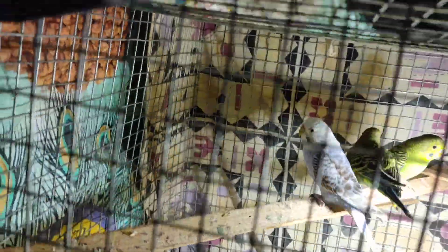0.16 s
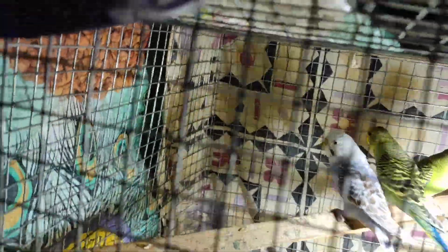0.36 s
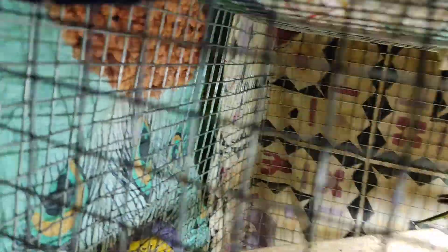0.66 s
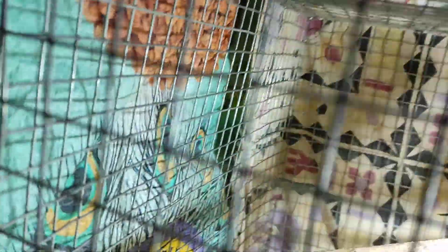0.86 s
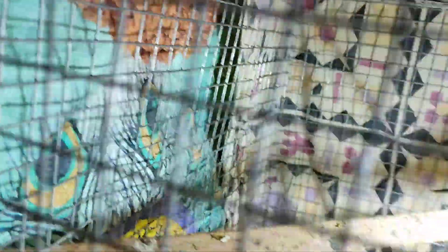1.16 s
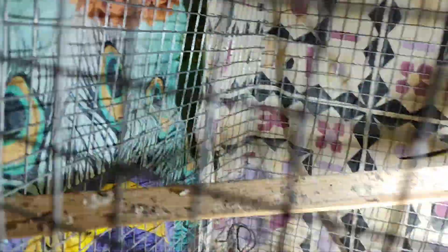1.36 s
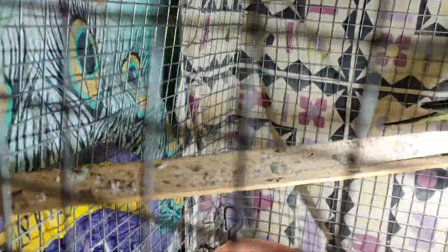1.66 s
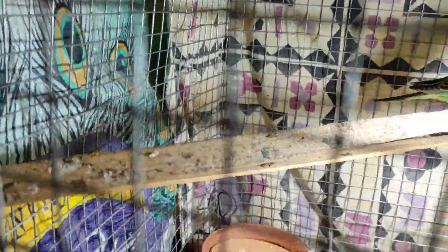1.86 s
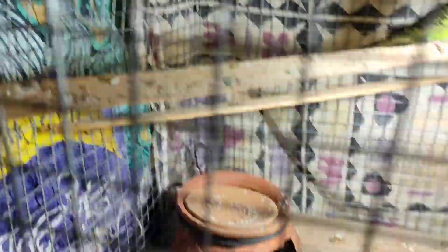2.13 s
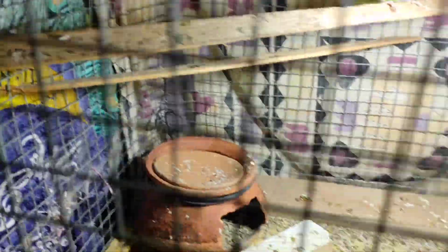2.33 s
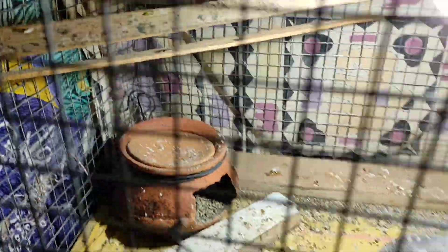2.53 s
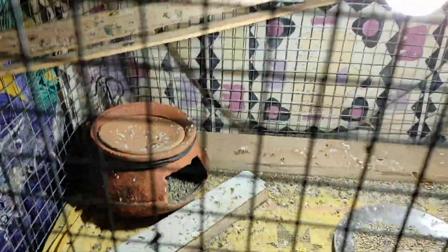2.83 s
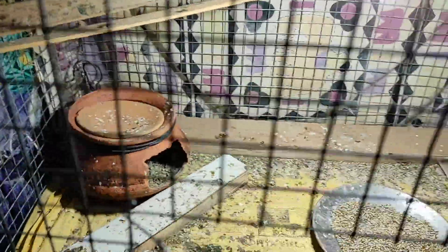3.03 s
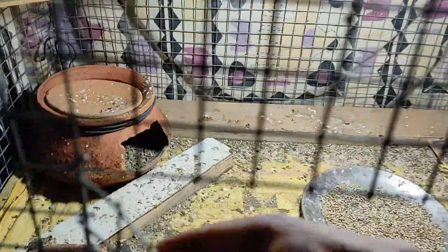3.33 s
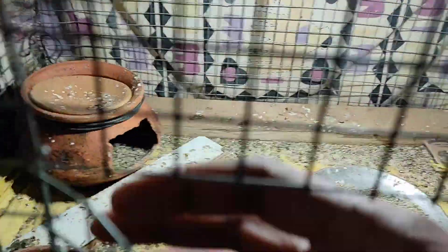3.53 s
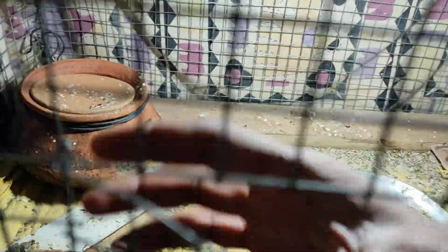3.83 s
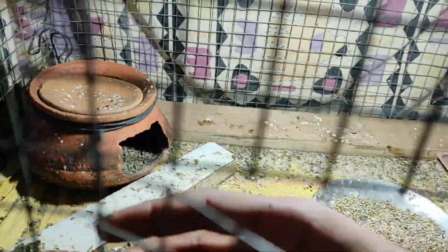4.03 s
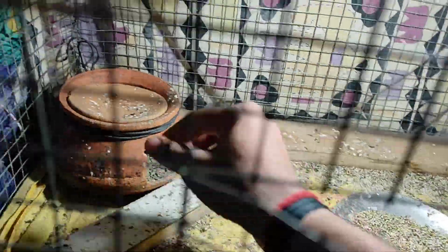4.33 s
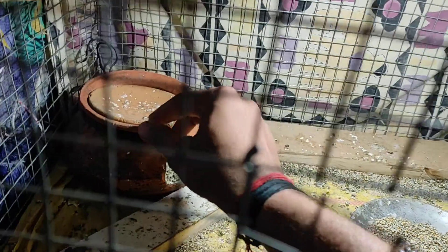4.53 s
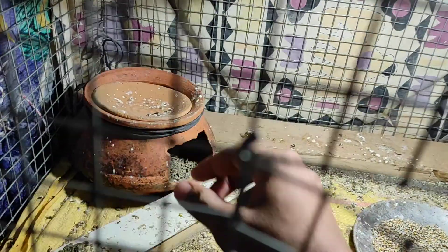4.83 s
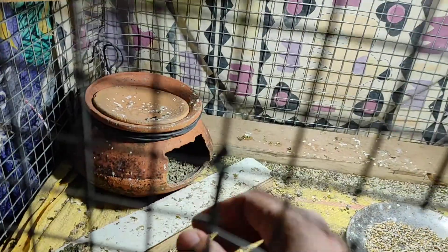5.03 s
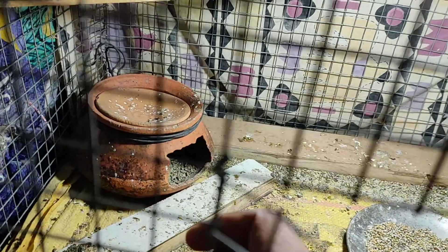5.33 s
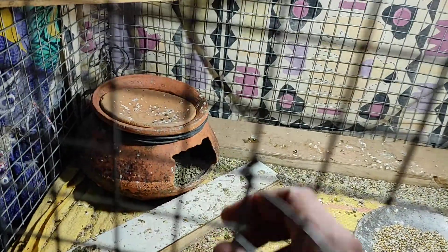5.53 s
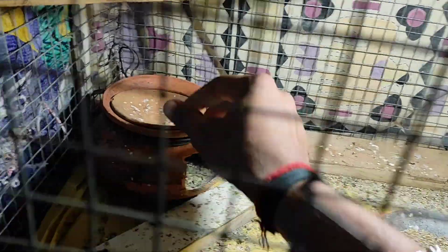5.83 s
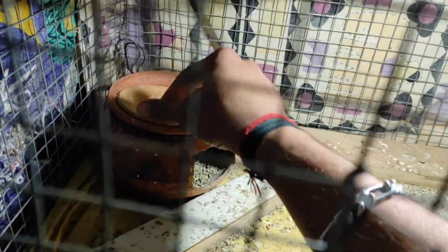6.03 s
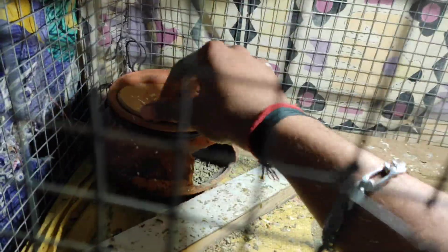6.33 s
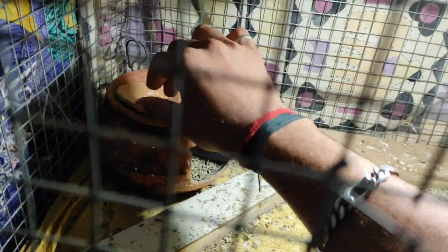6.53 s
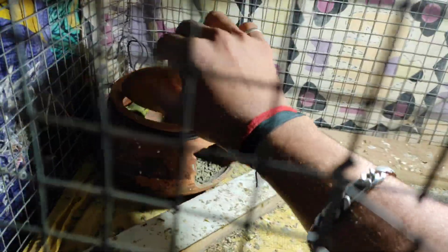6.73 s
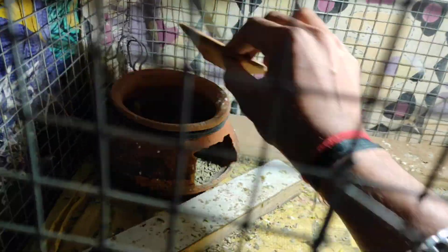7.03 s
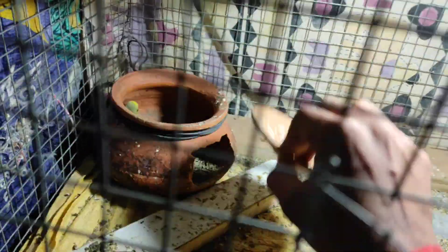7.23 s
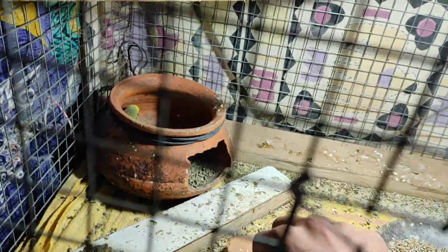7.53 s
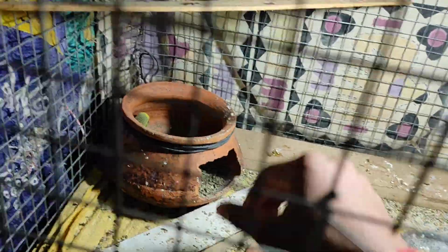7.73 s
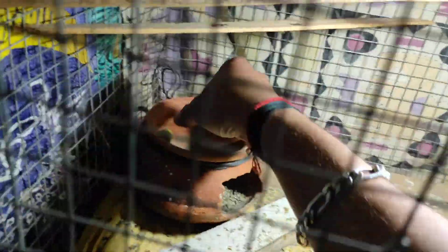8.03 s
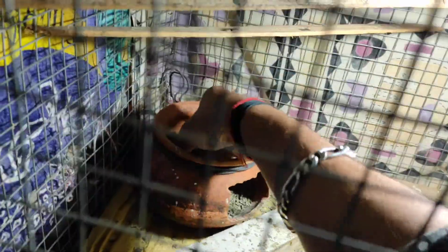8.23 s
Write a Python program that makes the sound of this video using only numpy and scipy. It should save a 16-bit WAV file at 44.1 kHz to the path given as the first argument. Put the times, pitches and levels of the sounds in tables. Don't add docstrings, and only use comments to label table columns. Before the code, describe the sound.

Wings flutter and claws clatter on cage wire, then a young bird begs in rapid, even, raspy high chirps while clay is tapped.

```python
import sys
import numpy as np
from scipy import signal
from scipy.fft import rfft, irfft, next_fast_len
from scipy.io import wavfile
from scipy.ndimage import uniform_filter1d, minimum_filter1d

SR = 44100
rng = np.random.default_rng(int(sys.argv[2]) if len(sys.argv) > 2 else 0)


def invert_db(x):
    u = np.asarray(x, float) / 20
    return 10 ** u


def persist_wave(psi):
    counts = np.round(np.clip(psi, -1, 1) * 32767).astype(np.int16)
    wavfile.write(sys.argv[1], SR, np.atleast_2d(counts).T)


N = 369999

# (frequency [Hz], density [dB])
ROOM_SPECTRUM = [(150, -34), (250, 10), (312, -46.5), (340, -14.5), (531, 1.5), (736, -33), (873, -57.5),
                 (951, -10), (3000, -15), (5010, -25.5), (7430, -18.5), (15000, -65)]
# (time [s], length [s], pitch [Hz], glide [ratio], level [dB])
FAR_NOTES = [
    (5.27, .08, 540, 1, -58),
    (6.11, .12, 545, 1, -54),
    (.89, .055, 4400, .75, -37),
    (1.09, .045, 5800, .9, -36),
    (5.595, .075, 1900, 1.05, -43),
    (5.6, .07, 3500, 1.08, -42),
    (5.61, .06, 3900, .95, -47),
    (5.755, .06, 2900, .75, -44),
    (5.86, .095, 2850, .92, -45),
]
# (time [s], level [dB])
SHAKE = [(0, -53), (.21, -62.5), (.61, -54.5), (.72, -34), (1.0, -52), (1.05, -39), (1.8, -40), (1.85, -66),
         (1.94, -40), (2.34, -60), (3.55, -58.5), (3.9, -50), (4.11, -62), (6.6, -55.5), (7.43, -64),
         (7.52, -48), (7.97, -47), (8.01, -59)]
# (time [s], half length [s], thud level [dB], creak level [dB])
FINGER_SHIFTS = [
    (0.224, 0.74, -79, -60),
    (1.397, 0.2, -59, -42.5),
    (1.89, 0.14, -48, -42.5),
    (2.47, 0.086, -69, -36.5),
    (2.69, 0.27, -55, -51.5),
    (3.438, 0.031, -41, -65),
    (6.79, 0.18, -68, -51.5),
    (7.392, 0.29, -73.5, -48),
    (8.39, 0.11, -58, -47),
]
# (time [s], level [dB])
RUSTLE = [(0, -56), (.45, -68), (.5, -56), (.6, -39), (.8, -32.5), (1.0, -35), (1.12, -36), (1.18, -35),
          (1.24, -37), (1.32, -40.5), (1.4, -39), (2.05, -40), (2.85, -44.5), (3.5, -51), (6.55, -57),
          (7.0, -63.5), (7.35, -53), (7.84, -40.5), (8.05, -57), (8.13, -58), (8.39, -52)]
# (time [s], treble level [dB], 1-4.5 kHz level [dB])
SCUFFS = [(1.56, -44, -51), (1.93, -43, -43.5), (2.19, -37, -55), (2.45, -33, -37), (2.71, -38, -42.5),
          (2.97, -71, -55), (3.1, -50, -44.5), (3.23, -51, -86), (3.5, -72, -47), (3.8, -50, -65),
          (4.511, -55, -56), (4.641, -61, -60), (4.781, -75, -75), (4.91, -39.5, -47.5), (5.501, -66, -47),
          (5.65, -53, -46.5), (5.791, -36, -41.5), (6.75, -51, -59), (6.92, -63, -91), (7.49, -50, -44),
          (7.36, -55, -48)]
# (time [s], length [s], treble level [dB], relative 1-4.5 kHz level [dB], brightest [Hz])
WING_BEATS = [(0.523, 0.035, -27.5, -11.5, 7500), (0.554, 0.033, -36.5, -2.5, 8000),
              (0.611, 0.041, -36, -28, 7800), (0.686, 0.075, -37, -2, 7640), (0.831, 0.032, -39, 2, 7600),
              (0.886, 0.069, -31.5, -19, 8850), (0.957, 0.035, -24.5, -27, 7400),
              (0.993, .03, -47, -16, 7800), (1.052, 0.037, -34.5, -10, 8160),
              (1.076, 0.059, -23, -18.5, 7400), (1.124, 0.021, -31, -7, 8300),
              (1.194, 0.028, -37, -19, 8000), (1.259, 0.047, -35.5, -9, 8360),
              (1.325, 0.029, -41, 2.5, 7500)]
# (time [s], peak level [dB], relative 1-4 kHz level [dB], t60 [s])
WIRE_TICKS = [(0.3461, -49.5, -6, 0.026), (0.399, -42.5, -23, 0.071), (0.4604, -40, -25, 0.022),
              (0.482, -37, -19, 0.06), (0.494, -27, -15, 0.031), (0.518, -8.5, -28, 0.078),
              (0.543, -18, -20, 0.03), (0.602, -23.5, -19, 0.037), (0.636, -14.5, -10, 0.031),
              (0.692, -23, -9, 0.052), (0.7577, -1.5, -9.5, 0.018), (0.7987, -10, -8.5, 0.016),
              (0.8225, -12, -7.5, 0.018), (0.886, -22, -17, 0.063), (0.952, -18, -39, 0.03),
              (1, -18, -30, 0.013), (1.031, -19, -18, 0.033), (1.042, -12, -9, 0.03),
              (1.156, -21.5, -3, 0.029), (1.166, -25.5, 0, 0.035), (1.1922, -18, -15, 0.034),
              (1.2236, -20, -7.5, 0.026), (1.273, -27, -2.5, 0.034), (1.309, -27, -10, 0.048),
              (1.557, -23, -18, 0.023), (6.671, -41, -2, 0.069), (6.70, -40, -5, 0.045),
              (6.739, -32, -10, 0.038), (6.757, -22, 0.5, 0.033), (6.798, -40, -5, 0.081),
              (6.84, -39, -18, .025), (6.857, -34.5, -8, 0.026), (6.881, -37, -25, 0.028),
              (6.893, -36, -17, 0.033), (6.902, -42, -18, .025), (6.914, -36, -18, 0.027),
              (1.929, -25, -9, 0.049), (2.074, -25, -13, 0.039), (2.168, -41, -15, .04),
              (2.4415, -35, -10, .04), (7.296, -57, 2, 0.048), (7.322, -59, 0, .06), (7.492, -36, -7, 0.11),
              (8.0214, -37, -24, 0.072), (8.1395, -43.5, -12, 0.065), (8.1714, -42, -22, 0.058),
              (8.18, -37, -20, .04), (8.1958, -39, -24, 0.062), (8.2153, -42, -25, 0.077),
              (8.2682, -41, -18, .06), (8.281, -40, -14, 0.055), (8.3041, -40, -13, 0.079)]
# (time [s], peak level [dB], lowest mode [Hz], t60 [s], hardness [dB per octave])
BLOWS = [(0.24, -41, 464, 0.08, -4), (0.638, -22, 275, 0.043, -5), (0.709, -24, 214, 0.06, -27.5),
         (1.051, -18.5, 226, 0.11, -11), (1.111, -31, 200, 0.08, -16), (1.264, -34, 229, 0.13, -6),
         (2.432, -28, 413, 0.067, -16), (2.981, -35, 512, 0.054, -6), (3.078, -42, 584, 0.04, -2),
         (4.815, -39, 594, 0.14, 0), (4.916, -40, 350, 0.42, -4.5), (5.76, -42, 361, 0.18, -10),
         (6.692, -29, 242, 0.083, -5), (6.748, -28, 500, 0.046, -8), (7.071, -37.5, 318, 0.091, 0),
         (7.294, -28, 332, 0.045, -2)]
KNOCK_RATIOS = [1, 2.1, 3.1, 4.198, 5.1, 7.4]
# (frequency [Hz], level [dB], t60 [s])
WIRE_MODES = [(350, -4, 0.015), (1120, 0, 0.016), (1630, -9, 0.014), (2310, -4, 0.021), (3500, -16, .015)]
PERCH_MODES = [(376, -7, 0.074), (476, 1, 0.088), (1120, -9, 5.0), (1857, -25, 5.0), (2638, -28, 0.37),
               (2923, -58, 5.0)]
DOOR_MODES = [(191, -4, 0.11), (420, -3, 0.044), (650, -1, 0.07), (1110, -0.5, 0.068), (1448, -4, 0.045)]
LID_MODES = [(218, -3, 0.077), (574, 2, 0.043), (1140, -5, 0.053), (1615, -6, 0.058), (2520, -11, 0.037),
             (2950, -23, 0.033), (3400, -7, 0.018), (3830, -21, 0.055)]
CLUNK_TIMES = [
    0.757,
    2.443,
    3.416,
    6.755,
]
CLUNK_LEVELS = [
    -12,
    -25,
    -35.5,
    -23.5,
]
# (time [s], length [s], level [dB], third partial [dB])
CHIRPS_ALONE = [(1.344, 0.052, -17, 4), (1.463, 0.054, -14, -6.5), (1.582, 0.059, -17, 2),
                (1.706, 0.058, -19.5, 1.5), (1.831, 0.055, -17, 6), (1.956, 0.058, -16, 4),
                (2.087, 0.058, -14.5, -0.5), (2.207, 0.072, -15, 1.5), (2.344, 0.063, -11, -9),
                (2.475, 0.061, -14, -5), (2.607, 0.064, -17, -11.5), (2.736, 0.059, -17, -9),
                (2.863, 0.06, -16, -6.5), (2.994, 0.062, -16, 1), (3.122, 0.062, -10.5, -1),
                (3.254, 0.063, -15.5, 0.5), (3.389, 0.066, -18, -5.5), (3.531, 0.066, -16, 0.5),
                (3.676, 0.069, -18.5, 5.5), (3.824, 0.08, -18.5, -1.5), (3.979, 0.073, -19, -10),
                (4.121, 0.067, -16.5, -8.5), (4.255, 0.066, -16.5, -1.5)]
# (time [s], length [s], level [dB], third partial [dB])
CHIRPS_HAND = [(4.393, 0.066, -17.5, 6), (4.533, 0.064, -17, 2), (4.67, 0.059, -12.5, 3),
               (4.799, 0.063, -15.5, 0.5), (4.935, 0.078, -13, -4.5), (5.089, 0.066, -14, -5.5),
               (5.228, 0.066, -15, -1.5), (5.375, 0.07, -13.5, -4), (5.53, 0.071, -18, -1),
               (5.668, 0.074, -15.5, 1), (5.814, 0.067, -14.5, 2.5), (5.954, 0.069, -11, -8),
               (6.099, 0.069, -15.5, -4), (6.239, 0.066, -17.5, 0), (6.382, 0.083, -14.5, -7),
               (6.546, 0.069, -14.5, 1), (7.038, 0.072, -15.5, -12), (7.184, 0.076, -12, -8.5),
               (7.364, 0.076, -11, -17), (7.522, 0.074, -15, -5.5), (7.678, 0.082, -14.5, -6.5),
               (7.898, 0.079, -14.5, -3), (8.334, 0.21, -10.5, -9)]
FIRST_PARTIAL = [2, -5, 4, -10, -7.5, 0, 5, 1.5, 1.5, 0.5, -3.5, 3, 0, 0, -3.5, -6.5, 2, 0.5, 5, 1, -2.5,
                 -3.5, -7.5, -4, 1.5, 1.5, 4, 3, 6.5, 3, 2.5, 5, 1.5, -4, 0, 2, 1.5, 3, 1.5, -1.5, 0, -6,
                 1.5, 7, -0.5, -0.5]
SHYNESS = [-14, -4, -1, -7, -6, -21, -14, -23.5, -11.5, -14, -18, -6, -14, -6, -11.5, -11.5, -1, -7, -5.5,
           1, -8.5, -11.5, -6.5, 0.5, 0, -12.5, -20, -14, -7, -4, -7.5, 0.5, -9, -7, -15.5, -5, -9, -12, -6,
           0, -7, -4.5, 1, -6, -12, -14]
# (time [s], throb rate [Hz], top pitch [Hz])
SYRINX = [(1.342, 140.9, 2858), (2.089, 136.2, 2920), (2.211, 127.3, 2987), (4.1, 120.9, 3062),
          (4.453, 127.5, 2913), (5.103, 123.1, 2968), (5.8, 120.1, 2931), (6.553, 106.5, 2837),
          (7.04, 133.2, 3065), (7.179, 111, 2950), (8.341, 122.8, 2877)]
# (time [s], rasp against tone [dB])
HOARSENESS = [(1.3, -1), (1.6, -4), (2.3, -7), (3.3, -8), (4.4, -9), (5.7, -9), (6.4, -7), (7.0, -4),
              (8.4, -4)]
PARTIALS = [-11.5, -4.5, -10, -12.5, -6.5]
# (frequency [Hz], then left and right density [dB] for each of the five stages)
POT_COLOUR = [(1423, -21, -25.5, -30, -30.5, -30, -32.5, -31, -34.5, -29, -28),
              (1980, -17, -17.5, -25, -24, -25.5, -21, -15.5, -20.5, -16.0, -21),
              (2400.0, -10.5, -14, -20.5, -21.5, -19, -10.5, -21, -19, -20.5, -14),
              (2950.0, -17.5, -8.0, -16, -5.5, -10, -0.5, -15.5, -7.5, -15.5, -7.5),
              (3493, -23.5, -17, -25.5, -21.5, -29, -20, -26, -19.5, -21.5, -16.5),
              (3980, -10.5, -14, -19, -17, -18, -14, -15.5, -12, -11, -11.5),
              (4630, -13.5, -11, -15, -26, -14, -16, -7.5, -14, -7.0, -6.5),
              (5530, -0.5, -5.0, -4, -3.5, 2, -6, 1, -3.5, -2, -7.0),
              (6080, -3, 2.5, 1.5, -7.5, 1, -1, -0.5, 1.5, -8, -1),
              (6680, -4.5, -3, -13.5, -3, -6, 0.5, -13.5, 0, -3.5, 0.5),
              (7400.0, -4.5, -3, -17.5, -2, -8, 1.5, -16, -2.0, -1.5, 2.5),
              (8000.0, -9.5, -14.5, -12.5, -8, -9, -13.5, -9, -13, 2.5, 1),
              (8575, -1.0, -9, -4, -15, 1.5, -5, -0.0, -15.5, 2, -8.5),
              (9160, -5, -23, -12.5, -15, -15, -16, -14.5, -21.5, -7.5, -19),
              (9780, -26.5, -18.5, -34, -35.5, -30, -42, -29.5, -32, -25, -40),
              (11040, -13.5, -21, -21.5, -20, -16, -18, -19, -18.5, -20, -16),
              (12600, -39, -27, -40, -50, -34.5, -37, -42, -38, -22, -29),
              (14200.0, -35, -31.5, -39, -36, -37.0, -33.5, -37.5, -36.5, -39, -31)]
STAGE_ENDS = [
    2.15,
    3.2,
    4.35,
    6.9,
]


def band(x, lo_hz, hi_hz, order=2):
    return signal.sosfilt(signal.butter(order, [lo_hz, hi_hz], "band", fs=SR, output="sos"), x)


def unit(x):
    return x / np.sqrt(np.mean(x ** 2) + 1e-20)


def walk(rate, size=N):
    k = int(SR / rate)
    held = np.repeat(rng.standard_normal(size // k + 1), k)
    return 1.2 * uniform_filter1d(held, k)[:size]


def columns(table):
    s, *rest = np.transpose(table)
    return [np.interp(np.arange(N) / SR, s, c) for c in rest]


def bumps(times, half_s, db):
    t = np.arange(N) / SR
    return sum(invert_db(d) * np.clip(1 - abs(t - s) / h, 0, 1) ** 2 for s, h, d in np.broadcast(times, half_s, db))


def colour(x, hz, db, flatten_hz=0):
    size = next_fast_len(x.shape[-1])
    f, spec = np.fft.rfftfreq(size, 1 / SR), rfft(x, size)
    if flatten_hz:
        k = int(flatten_hz / f[1])
        own = uniform_filter1d(uniform_filter1d(abs(spec) ** 2, k), k)
        spec = spec / np.sqrt(abs(own) + 1e-4 * own.max())
    curve_hz = np.r_[.6 * hz[0], hz, 1.12 * hz[-1]]
    curve_db = np.r_[db[0] - 15, db, db[-1] - 9]
    gain_db = np.interp(np.log(f + 1), np.log(curve_hz), curve_db)
    return irfft(spec * invert_db(gain_db), size)[..., :x.shape[-1]]


def pair(like):
    mid, side = rng.standard_normal((2, N))
    like = np.clip(like, 0, 1)
    return np.sqrt(1 + like) * mid + np.sqrt(1 - like) * side * np.array([[1], [-1]])


def add(out, s, x):
    i = int(s * SR)
    n = min(x.shape[-1], out.shape[-1] - i)
    out[..., i:i + n] += x[..., :n]


def feathery(noise, mid_db, top_db, hz=7800):
    peak = unit(band(noise, .9 * hz, min(1.1 * hz, 9300)))
    high = peak + invert_db(-4) * unit(band(noise, 5900, 9200, order=4))
    top = invert_db(top_db) * unit(band(noise, 10000, 15500, order=3))
    mid = unit(band(noise, 900, 4000)) * invert_db(mid_db + np.array([[-1.5], [1.5]]))
    return unit(high) + top + mid


def room():
    hiss = band(colour(pair(.1), *np.transpose(ROOM_SPECTRUM)), 150, 9300, order=4)
    return unit(hiss) * invert_db(-62.5 + 3.0 * walk(0.98))


def far_tones():
    out = np.zeros((2, N))
    for s, length, hz, glide, db in FAR_NOTES:
        wobble = .005 if hz < 1000 else .05
        n = int(length * SR)
        pitch = [hz * np.linspace(1, glide, n) * (1 + wobble * walk(480, size=6000)[:n]) for _ in range(2)]
        phase = 2 * np.pi * np.cumsum(pitch, axis=1) / SR
        note = np.sin(phase) + invert_db(-4) * np.sin(2 * phase)
        add(out, s, invert_db(db) * signal.windows.tukey(n, .5) * note)
    return out


def handling():
    shake = invert_db(columns(SHAKE)[0])
    s, half_s, thud_db, creak_db = np.transpose(FINGER_SHIFTS)
    sway = invert_db(-56.5) + invert_db(-1.5) * uniform_filter1d(shake, int(0.24 * SR))
    thud = shake + bumps(s, half_s, thud_db)
    creak = invert_db(-69.5) + invert_db(-9.5) * shake + bumps(s, half_s, creak_db)
    deep = unit(band(pair(0.93), 19.2, 52.3)) * sway * invert_db(np.array([[3.0], [-5]]))
    low = unit(band(pair(0.85), 77.5, 224)) * thud
    low = low * invert_db(1.52 * walk(19) + np.array([[2.6], [-3.5]]))
    mid = unit(band(pair(0.1), 165, 810, order=3)) * creak
    mid = mid * invert_db(4.64 * walk(40) + np.array([[2.1], [-2.1]]))
    return deep + low + mid


def rustle():
    stir = invert_db(columns(RUSTLE)[0])
    s, treble_db, mid_db = np.transpose(SCUFFS)
    scuff_s = 0.2
    treble = stir + bumps(s, scuff_s, treble_db)
    mid = stir * invert_db(-7.5) + bumps(s, scuff_s, mid_db)
    grains = pair(0) * invert_db(3.04 * walk(130) + 1.4 * walk(780) + 5.3 * walk(25))
    return treble * invert_db(-3.5) * feathery(grains, 20 * np.log10(mid / treble), -19.5, 7670)


def flaps(size=4000):
    out = np.zeros((2, N))
    for s, length, db, mid_db, hz in WING_BEATS:
        grains = rng.standard_normal((2, size))
        grains = grains * invert_db(3.0 * walk(300, size=size) + 2.5 * walk(90, size=size))
        n = int(length * SR)
        swish = feathery(grains, mid_db, -24.5, hz)[:, :n]
        add(out, s, invert_db(db) * swish * signal.windows.tukey(n, .4))
    return out


def ticks(size=3000):
    out, t = np.zeros((2, N)), np.arange(size) / SR
    for s, db, mid_db, t60 in WIRE_TICKS:
        crack = feathery(rng.standard_normal((2, size)), mid_db, -17.5, rng.uniform(7440, 8270))
        decay = invert_db(db - 1.5 - 60 * t / max(t60, .004))
        add(out, s, crack * decay * np.clip(t / 0.0017, 0, 1))
    return out


def knocks(size=5000):
    out, t = np.zeros((2, N)), np.arange(size) / SR
    for s, db, hz, t60, hard_db in BLOWS:
        ring = np.zeros(size)
        for r in np.array(KNOCK_RATIOS) * (1 + 0.066 * rng.standard_normal(len(KNOCK_RATIOS))):
            strike_db = min(hard_db, 0) * np.log2(r)
            decay_db = -60 * t * r ** 0.57 / max(t60, .01)
            shudder_db = 6.4 * walk(243, size=size)
            ring += invert_db(strike_db + decay_db + shudder_db) * np.sin(2 * np.pi * hz * r * t)
        add(out, s, invert_db(db - 7.5 + np.array([[1.5], [-2.5]])) * ring * np.clip(t / 0.0016, 0, 1))
    return out


def clunks(size=5000):
    out, t = np.zeros((2, N)), np.arange(size) / SR
    objects = (WIRE_MODES, PERCH_MODES, DOOR_MODES, LID_MODES)
    for s, db, modes in zip(CLUNK_TIMES, CLUNK_LEVELS, objects):
        top_db = max(m[1] for m in modes)
        ring = np.zeros(size)
        for hz, mode_db, t60 in modes:
            decay_db = -60 * t / np.clip(t60, .015, .12)
            shudder_db = 4.1 * walk(197, size=size)
            ring += invert_db(mode_db - top_db + decay_db + shudder_db) * np.sin(2 * np.pi * hz * t)
        add(out, s, invert_db(db + np.array([[1.5], [-2.5]])) * ring * np.clip(t / 0.0023, 0, 1))
    return out


def chirp(length, throb_hz, top_hz, first_db, third_db, rasp_db, shy_db, size=5000):
    t = np.arange(size) / SR
    throb_rate = throb_hz * (1 + .3 * np.exp(-t / 0.011) + .05 * walk(70, size=size))
    turn = (np.cumsum(throb_rate) / SR + .25 * rng.random()) % 1
    sag = 1.04 + 0.03996 * np.exp(-t / 0.01202) - .055 * t / length + 0.01807 * walk(108.7, size=size)
    sweep = 1 - .32 * np.exp(-turn / .14)
    waver = .075 * invert_db(rasp_db) * walk(900, size=size)
    hz = top_hz * sag * sweep * (1 + waver)
    phase = 2 * np.pi * np.cumsum(uniform_filter1d(hz, size=12)) / SR
    leak = (0.14 + 0.62 * invert_db(rasp_db)) * np.clip(.2 + t / 0.044, 0, 1)
    air = leak + abs(np.sin(np.pi * turn ** 1.1)) ** 1.4
    air = air * invert_db(1.5 * walk(130, size=size))
    tone = np.zeros(size)
    for k, db in enumerate(np.array(PARTIALS) + np.array([first_db, 0, third_db, 0, 0])):
        tone += invert_db(db + 3.2 * walk(500, size=size)) * np.sin((k + 1) * phase)
    fray_db = 1.5 * (np.minimum(t / length, 1) - .5)
    tone = tone * invert_db(-fray_db / 2)
    rasp = invert_db(rasp_db + fray_db / 2 + 1.55 * walk(700, size=size))
    rasp = rasp * band(rng.standard_normal(size), 980, 19000, order=1)
    swell_db = shy_db * np.exp(-t / 0.0067) - 5.6 * (t / length) ** 3
    swell = np.clip(t / 0.00093, 0, 1) * invert_db(swell_db)
    swell = swell * np.clip((length + 0.0098 - t) / 0.021, 0, 1)
    voice = (tone + rasp) * air * swell
    return voice / np.std(voice[:int(length * SR)])


def echoes(direct, pot_db, pot_t60, cage_db, cage_t60, size=9000):
    t = np.arange(size) / SR
    pot, cage = rng.standard_normal((2, 2, size))
    sparse = rng.random((2, size)) < .06
    tail = invert_db(cage_db - 60 * t / cage_t60) + invert_db(-76 - 60 * t / 0.6)
    ring = invert_db(pot_db - 60 * t / pot_t60) * pot * sparse + tail * cage
    ring[[0, 1], rng.integers(0, 9, size=2)] += direct
    return ring


def chick():
    out, path = np.zeros((2, N)), np.transpose(POT_COLOUR)
    stages = np.zeros((len(STAGE_ENDS) + 1, 2, N))
    at, throbs_hz, tops_hz = np.transpose(SYRINX)
    kept = [echoes(0, -15, .01, -58, .055) for _ in stages]
    calls = list(CHIRPS_ALONE) + list(CHIRPS_HAND)
    for (s, length, db, third_db), first_db, shy_db in zip(calls, FIRST_PARTIAL, SHYNESS):
        throb_hz, top_hz = np.interp(s, at, throbs_hz), np.interp(s, at, tops_hz)
        rasp_db = np.interp(s, *np.transpose(HOARSENESS))
        voice = chirp(length, throb_hz, top_hz, first_db, third_db, rasp_db, shy_db)
        stage = np.searchsorted(STAGE_ENDS, s)
        paths = kept[stage] + echoes(1, -17, .01, -54, .055)
        paths = paths / np.sqrt(np.sum(paths ** 2, axis=1, keepdims=True))
        add(stages[stage], s, invert_db(db) * signal.fftconvolve(voice[None], paths, axes=1))
    for k, wet in enumerate(stages):
        sounding = np.flatnonzero(wet[0])
        span = slice(sounding[0], sounding[-1])
        ports = [colour(wet[c, span], path[0], path[1 + 2 * k + c], flatten_hz=514) for c in range(2)]
        out[:, span] += unit(np.array(ports)) * np.std(wet[:, span]) * invert_db(3.5)
    return out


def scene():
    return chick() + rustle() + handling() + ticks() + flaps() + knocks() + clunks() + far_tones() + room()


def low_pass(x):
    return signal.sosfilt(signal.butter(12, 16660, fs=SR, output="sos"), x)


def record(dry):
    peak = -minimum_filter1d(-np.abs(dry).max(axis=0), size=60)
    gain = np.minimum(1, (.6 / (peak + 1e-9)) ** .6)
    held = dry * uniform_filter1d(gain, size=60)
    cut = signal.sosfilt(signal.ellip(8, .2, 70, 15900, fs=SR, output="sos"), held)
    return low_pass(np.clip(cut, -1, 1))


dry = scene()
out = record(dry)
persist_wave(out)
```